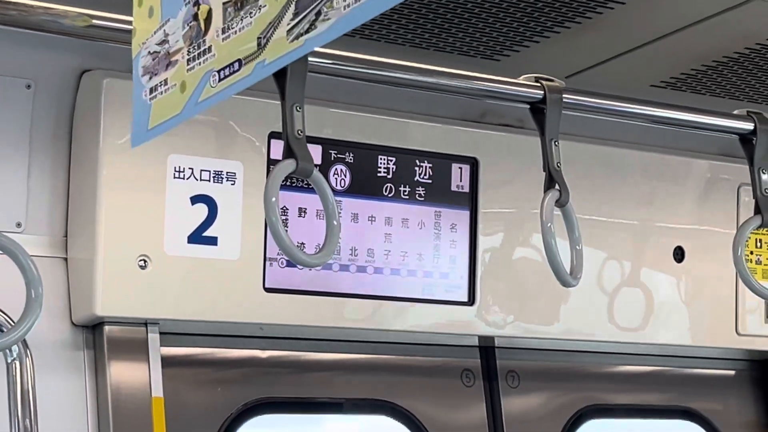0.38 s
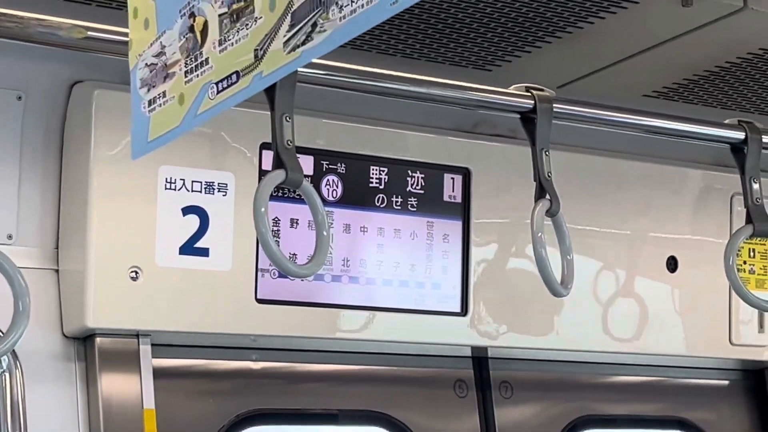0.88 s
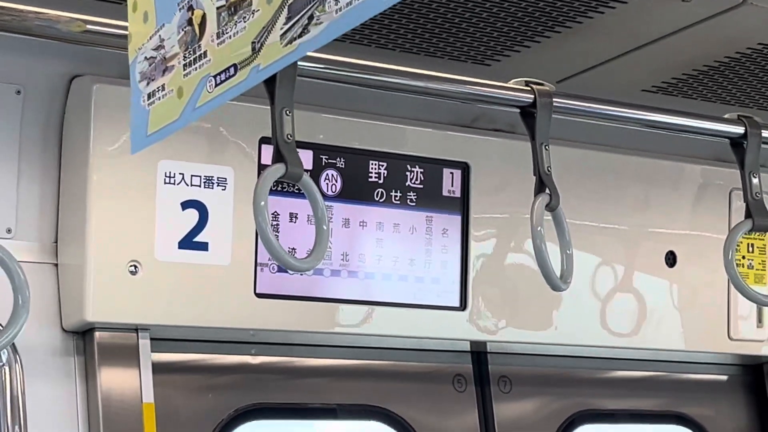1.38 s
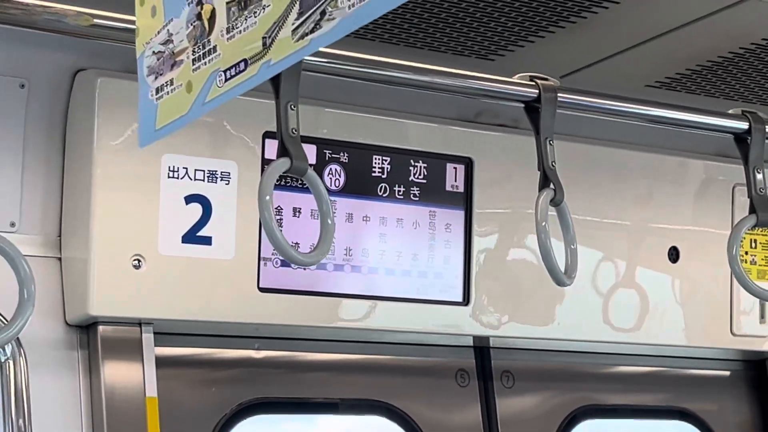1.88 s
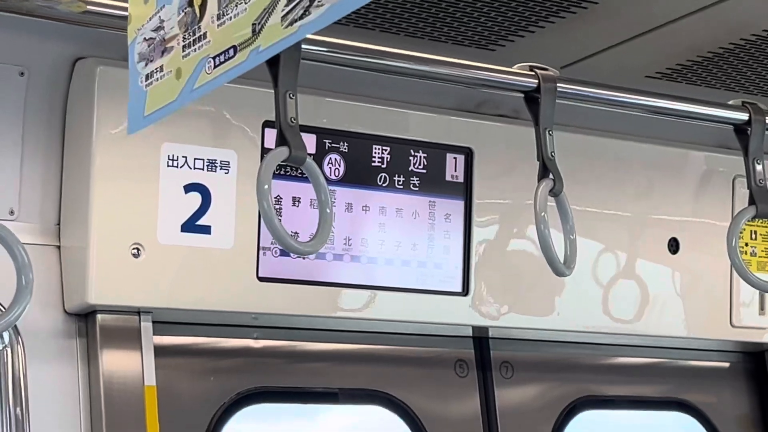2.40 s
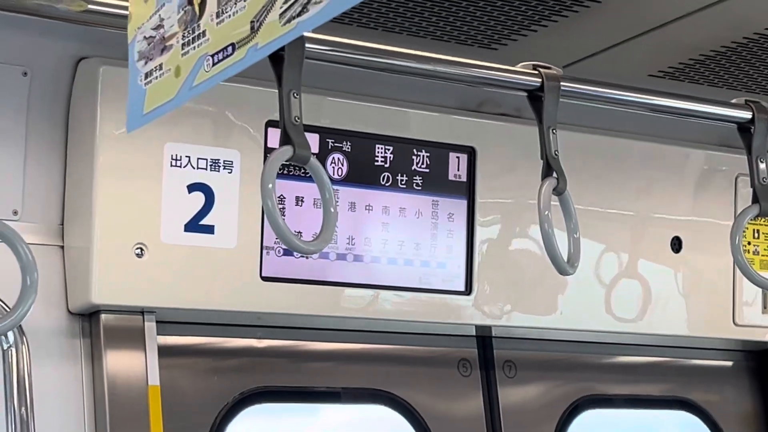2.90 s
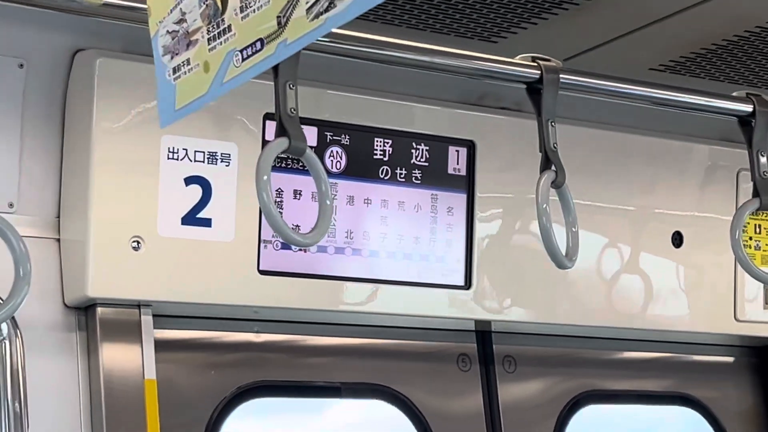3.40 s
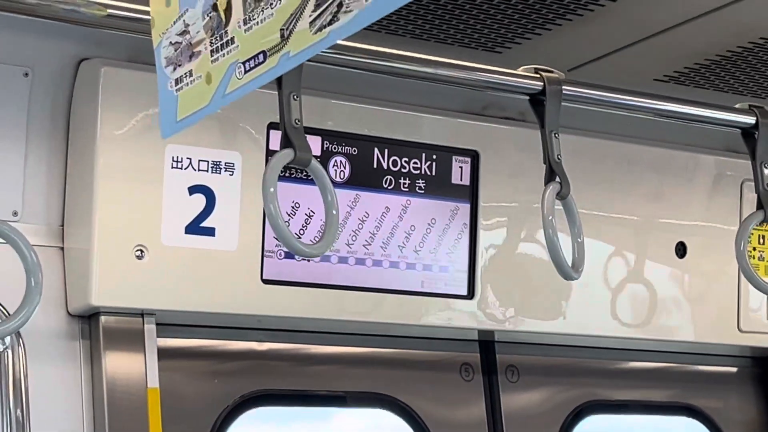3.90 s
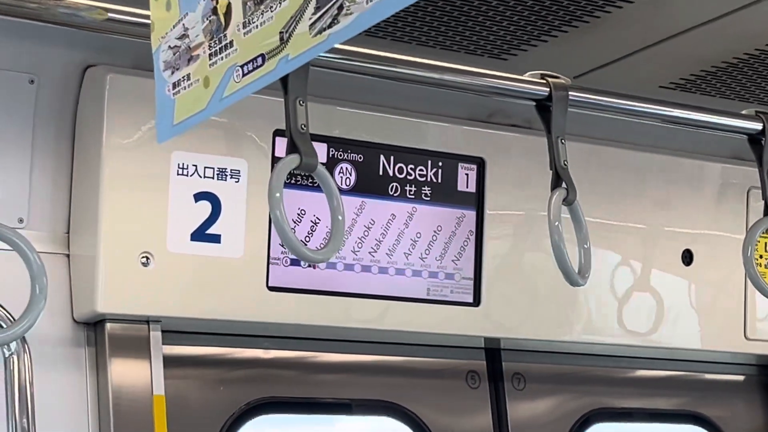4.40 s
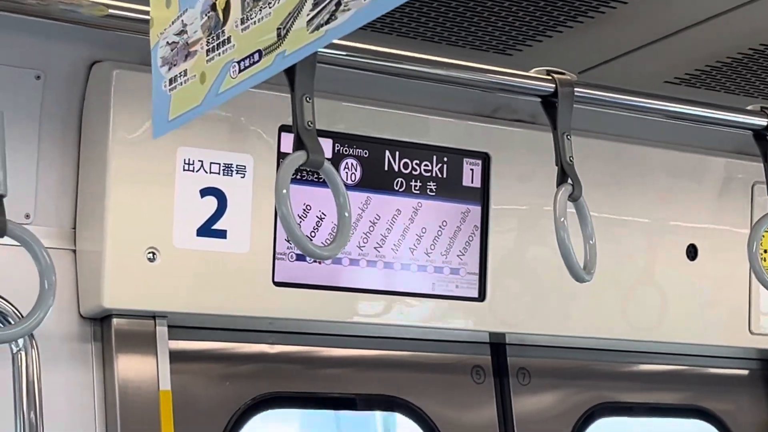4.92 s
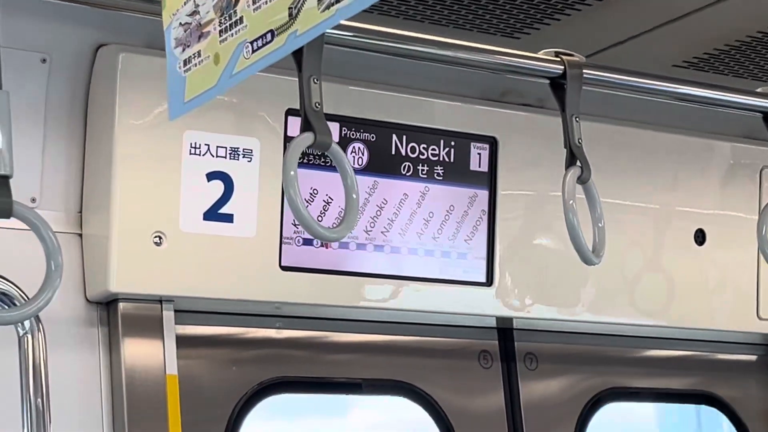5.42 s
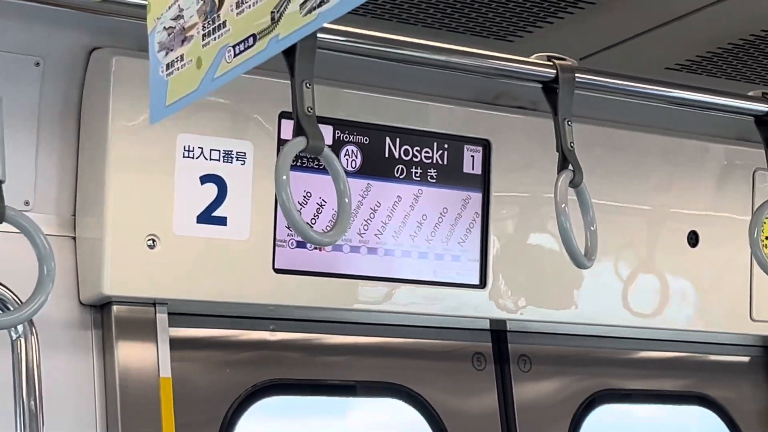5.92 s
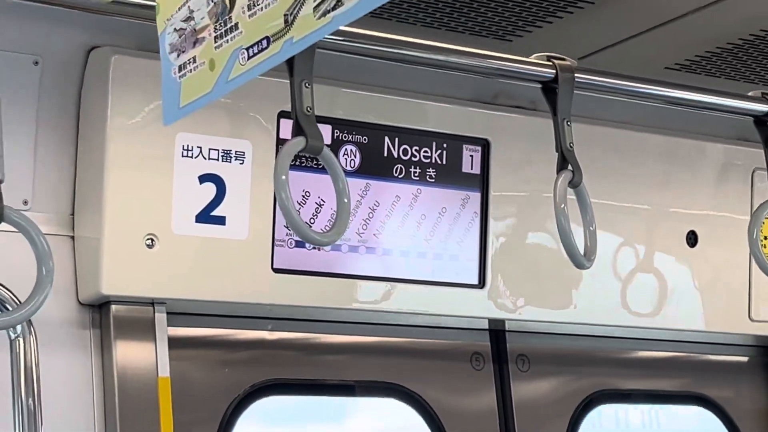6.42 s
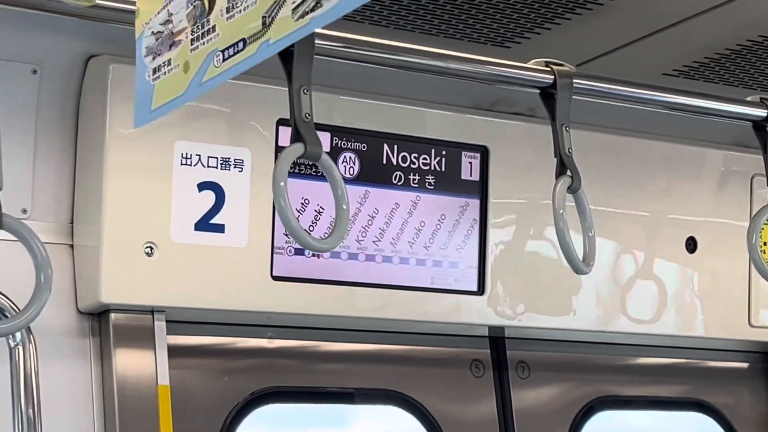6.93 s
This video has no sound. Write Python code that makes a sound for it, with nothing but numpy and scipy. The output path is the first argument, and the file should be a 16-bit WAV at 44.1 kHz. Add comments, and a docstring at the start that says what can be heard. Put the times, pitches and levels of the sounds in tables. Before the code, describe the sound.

Handheld stereo microphone in a train car between stations: bass-heavy rolling noise never stops, coloured by the body of the carriage, with close motor tones beating against each other. Brief hisses of air puff in the first second or so, a chirpy squeak of fittings sounds around the middle, a small click comes late, and dull deep bumps from the wheels finish it.

```python
"""Inside a running electric train

Three motors hum as sums of sinusoids at close shaft rates, which beat against each other.
Wheels and rails rumble and roar: broadband noise shaped by the resonances of the body.
Puffs of air (decaying noise), squeaks of the fittings (gliding tones), small ticks (noise bursts)
and dull knocks from the bogie (damped low modes) pass over it, above faint tones of the electrics."""
import sys
import numpy as np
from scipy import signal
from scipy.fft import rfft, irfft
from scipy.io import wavfile
from scipy.ndimage import uniform_filter1d

SR = 44100
rng = np.random.default_rng(int(sys.argv[2]) if len(sys.argv) > 2 else 0)


def store_pcm(level_fs):
    """Save levels as 16-bit WAV."""
    pcm = np.round(np.clip(level_fs, -1, 1) * 32767).astype(np.int16)
    wavfile.write(sys.argv[1], SR, np.atleast_2d(pcm).T)


def volts(x):
    """Linear amplitude factor 10**(x/20) for a level x in dB, scalar or array-like."""
    e = np.asarray(x, float) / 20
    return 10 ** e


N = 310905
T = np.arange(N) / SR  # time [s]
F = np.maximum(np.arange(N // 2 + 1) * SR / N, 1)  # frequency of each spectral bin [Hz]


def along(table, column=1):
    """Spectral interpolation: a table column over all frequencies, straight on a log axis."""
    table = np.array(table, float)
    return np.interp(np.log(F), np.log(table[:, 0]), table[:, column])


def unit(x):
    """Normalisation: scale to an rms of 1."""
    return x / np.sqrt(np.mean(x ** 2))


def walk(rate):
    """Low-pass random modulation: values held for 1 / rate [s], smoothed twice, with an rms near 1."""
    k = int(SR / rate)
    held = np.repeat(rng.standard_normal(N // k + 1), k)
    smooth = uniform_filter1d(uniform_filter1d(held, k), k)
    return unit(smooth[:N])


def bell(hz, width):
    """Simple resonance: the gain of a damped oscillator, 1 at its centre."""
    return 1 / np.sqrt(1 + ((F - hz * hz / F) / width) ** 2)


# faint tones of the electrics: (frequency [Hz], level [dB], rms waver of the level [dB])
ELECTRIC_TONES = [(120, -38.5, 2), (10730, -86, 2.5)]


def electric_tones():
    """Amplitude and phase modulation: sinusoids whose level and phase waver slowly."""
    out = 0
    for hz, db, waver_db in ELECTRIC_TONES:
        level = np.sqrt(2) * volts(db + waver_db * walk(4.5))
        out = out + level * np.sin(2 * np.pi * hz * T + .5 * walk(2.97))
    return out


# small hard contacts: (time [s], level [dB], centre of the resonance [Hz])
TICKS = [(1.864, -52, 9500), (3.4, -48.5, 3000), (4.39, -60, 10440), (6.244, -40, 5000),
         (6.243, -64, 12200)]


def ticks():
    """Impact excitation: a few milliseconds of noise in a broad resonance, with a weak slower tail."""
    out, grit = np.zeros(N), rng.standard_normal(N)
    for s, db, hz in TICKS:
        age = np.maximum(T - s, 0)
        coloured = unit(irfft(rfft(grit) * bell(hz, .5 * hz) ** 2, N))
        decay = np.exp(-age / .0052) + .13 * np.exp(-age / .03)
        out += volts(db) * coloured * (T >= s) * decay
    return out


# squeaks of the fittings: (time [s], length [s], level [dB], pitch [Hz], roughness [0-1])
SQUEAKS = [(3.435, .115, -39.5, 2072, .2), (3.54, .05, -45.5, 2280, .3), (3.572, .045, -43, 2090, .3),
           (3.59, .04, -50, 1620, .5), (3.66, .035, -51, 2290, .6), (3.67, .04, -51, 1810, .6),
           (4.03, .065, -47, 2070, .4), (4.06, .1, -64, 3450, 1), (4.1, .1, -65, 5150, 1),
           (4.62, .03, -48, 1350, .5), (4.66, .04, -48, 1680, .5), (5.86, .04, -50, 2090, .3),
           (6.18, .16, -50, 2340, .9), (6.19, .14, -49, 2000, 1), (6.5, .03, -45, 2095, .4)]
# overtones of a fitting: (ratio to the pitch, relative level [dB], delay [s], added roughness)
SQUEAK_OVERTONES = [(1, 0, 0, 0), (1.66, -19, .04, .8), (2.01, -27, .015, .2), (2.48, -27, .03, .7)]
SQUEAK_WOBBLE, SQUEAK_RISE_PER_S = .005, .04  # rms wobble and rise per second, as shares of the pitch
SQUEAK_ATTACK_S, SQUEAK_T60_S = .012, .12


def squeaks():
    """Friction-driven oscillation: sliding sustains a tone; a rough grip scatters its level and phase."""
    out, wobble = np.zeros(N), 1 + SQUEAK_WOBBLE * walk(35)
    for ratio, tone_db, late, extra in SQUEAK_OVERTONES:
        scatter = (walk(110) + 1j * walk(110)) / np.sqrt(2)
        for start, length, db, hz, grit in SQUEAKS:
            s, rough = start + late, min(grit + extra, 1)
            cut = slice(int(s * SR), int((s + length + .2) * SR))
            age = T[cut] - s
            # the pressure eases as the slide goes on
            ease_db = -6 * np.clip(age / length - .4, 0, 1)
            decay_db = -60 * np.maximum(age - length, 0) / SQUEAK_T60_S
            slide = np.clip(age / SQUEAK_ATTACK_S, 0, 1) * volts(decay_db + ease_db)
            cycles = ratio * hz * np.cumsum(wobble[cut] + SQUEAK_RISE_PER_S * age) / SR
            tone = np.exp(2j * np.pi * cycles)
            grip = np.sqrt(1 - rough) + np.sqrt(rough) * scatter[cut]
            out[cut] += np.sqrt(2) * volts(db + tone_db) * slide * np.imag(grip * tone)
    return out


# puffs of air: (time [s], level [dB], hold [ms], centre of the band [Hz])
PUFFS = [(.1, -62, 42, 5900), (.172, -51, 55, 4800), (.415, -53.5, 25, 4500), (0.436, -35, 54, 3330),
         (.706, -67.5, 12, 6500), (.733, -43, 22, 3000), (1.182, -46.5, 50, 3900), (2.06, -54, 22, 3180),
         (2.36, -62, 30, 5550), (2.814, -58, 20, 4160), (3.107, -58, 34, 4470), (3.5, -60.5, 60, 3300),
         (3.733, -51.5, 25, 2800), (4.05, -59.5, 140, 4000), (5.89, -58, 18, 4500),
         (6.246, -52.5, 81, 3800), (6.565, -55.5, 56, 4480), (6.758, -60, 13, 4500), (6.857, -54, 38, 4550)]
# colour of the escaping air: (frequency [Hz], relative spectral level [dB])
PUFF_COLOUR = [(600, -33), (1300, 4.5), (2500, -2.5), (5400, -8.5), (7300, -14.5), (8600, -23.5),
               (11400, -20.5), (14400, -35.5)]
# a stronger puff is broader and takes longer to die: values at a reference level, and growth per dB
PUFF_REF_DB = -60
PUFF_WIDTH_HZ, WIDTH_HZ_PER_DB, PUFF_T60_MS, T60_MS_PER_DB = 2500, 178, 270, 11
CAR_RIPPLE_DB, CAR_RIPPLE_HZ = 1.5, 120  # rms ripple of the spectrum, and the width it is smoothed over


def puffs():
    """Turbulent jet noise: sudden start, short hold, decaying tail; each opening favours its own band."""
    air = rfft(rng.standard_normal((2, N))) * volts(along(PUFF_COLOUR))
    # standing waves of the car colour the air in fine peaks and dips
    ripple = uniform_filter1d(rng.standard_normal(len(F)), int(CAR_RIPPLE_HZ * N / SR))
    air = air * volts(CAR_RIPPLE_DB * unit(ripple))
    snap = unit(irfft(air * bell(5500, 5000) ** 2, N))
    out = np.zeros((2, N))
    for s, db, hold_ms, hz in PUFFS:
        width = PUFF_WIDTH_HZ + WIDTH_HZ_PER_DB * (db - PUFF_REF_DB)
        t60_ms = PUFF_T60_MS + T60_MS_PER_DB * (db - PUFF_REF_DB)
        age_ms = 1000 * np.maximum(T - s, 0)
        tail = volts(-60 * np.maximum(age_ms - hold_ms, 0) / t60_ms)
        flow = tail * unit(irfft(air * bell(hz, width) ** 2, N))
        # the first rush has a band and a 30 ms decay of its own
        rush = .3 * np.exp(-age_ms / 30) * snap
        out += volts(db) * (1 - np.exp(-age_ms / 2.5)) * (flow + rush)
    return out * volts(1.3 * walk(400))  # the level flickers rapidly


# knocks of the bogie: (time [s], level before the soft onset [dB], pitch [Hz], t60 [s])
KNOCKS = [(1.2, -18, 95, .3), (1.34, -16, 130, .3), (2.2, -20, 215, .3), (2.38, -18, 145, .3),
          (4.78, -19, 200, .3), (4.92, -16, 180, .4), (5.7, -18, 205, .4), (6.46, -22, 220, .2),
          (6.55, -3, 72, .3), (6.64, -6, 74, .25), (6.695, -8, 70, .25), (6.995, -2, 75, .22)]


def knocks():
    """Damped modal vibration: a soft heavy push rings one low mode of the floor."""
    out = np.zeros(N)
    for s, db, hz, t60 in KNOCKS:
        age = np.maximum(T - s, 0)
        onset = 1 - np.exp(-age / .01)
        out += volts(db - 60 * age / t60) * onset * np.sin(2 * np.pi * hz * age)
    return out


# course of the rolling noise, each column used relative to its mean:
# (time [s], rumble [dB], roar [dB], ring and hiss [dB])
ROLL_COURSE = [(0.0, -24, -32, -45), (0.45, -26, -28.5, -45), (0.9, -24.5, -30.5, -46.5),
               (1.37, -21.5, -29, -46), (1.82, -26.5, -32, -47.5), (2.2, -22.5, -29.5, -45),
               (2.41, -25, -31, -46), (3.3, -24, -31.5, -45.5), (3.69, -24.5, -30.5, -45),
               (4.28, -23, -31.5, -45), (4.53, -26, -31.5, -45.5), (4.85, -21.5, -28, -44),
               (5.26, -25, -31, -44.5), (5.63, -25.5, -28.5, -44.5), (6.18, -23.5, -29, -44),
               (6.56, -20.5, -29.5, -43.5), (6.77, -27.5, -28.5, -43), (7.05, -22.5, -30.5, -43)]
# centres of those three parts: (frequency [Hz])
ROLL_PART_HZ = [140, 550, 1990]
# colour of the rolling noise: (frequency [Hz], relative spectral level [dB])
ROLL_COLOUR = [(15, -38.5), (25, -10.5), (40, -6), (54, -8.5), (80, -5), (114, -2.5), (321, -15.5),
               (430, -15), (858, -20), (1580, -34.5), (2490, -39.5), (5200, -53.5), (7400, -58),
               (8600, -59), (9800, -62.5), (11500, -65), (14400, -71.5)]
# resonances of the car body: (frequency [Hz], width [Hz], lift [dB])
BODY_RESONANCES = [(59, 7.6, 11), (89.5, 17.6, 5), (127, 33, 1), (161.3, 38, 3), (217.6, 39, 4.5),
                   (297.4, 32, 2.5), (513, 187, 4), (881, 200, 2), (1366, 210, 5), (1760, 38, 8),
                   (1942, 150, 8)]
# brief swells of the rolling noise in one region: (time [s], lift [dB], centre [Hz])
ROLL_SWELLS = [(.22, 4, 550), (.57, 4.5, 400), (1.37, 3.5, 1490), (2.2, 2.5, 1504), (2.21, 3, 90.3),
               (2.38, 6, 179), (4.64, 2, 1494), (4.93, 3.5, 148.6), (4.99, 4.5, 1187), (5.72, 7, 190.5),
               (5.92, 2.5, 1510), (6.23, 5, 1585), (6.38, 0.5, 90.3), (6.62, 7, 1685)]
SWELL_S, SWELL_OCTAVES = .024, .83  # Gaussian spread in time and in pitch
ROLL_DB, FLICKER_DB = -21.5, .5  # rms level of the whole, rms flicker of each band


def rolling():
    """Source and filter: wheel noise lifted by body resonances, its half-octave bands swinging in level."""
    s, *parts_db = np.transpose(ROLL_COURSE)
    swings = [db - np.mean(db) for db in parts_db]
    centres = np.log(ROLL_PART_HZ)
    lift = 1 + sum((volts(db) - 1) * bell(hz, width) ** 2 for hz, width, db in BODY_RESONANCES)
    source = rfft(rng.standard_normal((2, N))) * volts(along(ROLL_COLOUR)) * lift
    at, lift_db, swell_hz = np.transpose(ROLL_SWELLS)
    swells = lift_db[:, None] * np.exp(-((T - at[:, None]) / SWELL_S) ** 2 / 2)
    out = 0
    for octave in np.arange(4.5, 14.5, .5):  # log2 of the band centre in Hz
        band = np.cos(np.pi / 2 * np.clip(2 * (np.log2(F) - octave), -1, 1)) ** 2
        # each band blends the swings of the nearest parts
        shares = [np.interp(octave * np.log(2), centres, row) for row in np.eye(len(centres))]
        swing_db = sum(share * swing for share, swing in zip(shares, swings))
        swell_db = np.exp(-((octave - np.log2(swell_hz)) / SWELL_OCTAVES) ** 2 / 2) @ swells
        # in the top octaves only part of the swing is left
        depth = np.clip(1 - .4 * (octave - 12.5), 0, 1)
        band_db = depth * np.interp(T, s, swing_db) + swell_db + FLICKER_DB * walk(8.3)
        out = out + irfft(source * band, N) * volts(band_db)
    return volts(ROLL_DB) * unit(out)


# shaft rates of the three motors: (frequency [Hz])
MOTOR_HZ = [56.725, 58.459, 58.64]
# lines of the hum: (motor index, multiple of the shaft rate,
# time at which it is in step with the first line of that multiple [s])
HUM_LINES = [(0, 1, 0), (1, 1, .262), (2, 1, .333), (0, 2, 0), (1, 2, .047), (1, 6, 0), (1, 7, 0),
             (2, 7, .695)]
# one row per line of the hum: (rms level before the swells [dB])
HUM_DB = [-24, -32.5, -29, -30.5, -35, -46.5, -42.5, -46]
# slow swells of the hum: (time [s], first motor [dB], all lines at seven times the shaft rate [dB])
HUM_SWELLS = [(0, -7.5, -2), (.5, -2.5, -2), (.9, -0.5, -0.5), (1.4, 1, 1.5), (1.75, -5, 3), (2.1, -0.5, 3),
              (2.8, -2.5, -2.5), (3.6, -5.5, 3.5), (4.2, 0, -1.5), (4.5, 3.5, 3), (5, 2.5, 2.5),
              (5.55, 3, 2.5), (5.75, -1.5, 2.5), (6.1, -2.5, 1), (6.35, -2, -3), (6.65, 4, 1.5),
              (7.05, 4, 3.5)]
HUM_WAVER_DB, HUM_SWAY_RAD = .96, .13  # rms waver of level and phase


def motor_hum():
    """Beating: lines at close shaft rates, and their multiples, drift in and out of step."""
    out, first_hz = 0, {}
    at, *columns = np.transpose(HUM_SWELLS)
    first_db, seventh_db = (np.interp(T, at, column) for column in columns)
    for (motor, multiple, s), db in zip(HUM_LINES, HUM_DB):
        hz = multiple * MOTOR_HZ[motor]
        lead_hz = first_hz.setdefault(multiple, hz)
        steady = 2 * np.pi * (hz * (T - s) + lead_hz * s) + np.pi * (multiple - 1)
        phase = steady + HUM_SWAY_RAD * walk(3.3)
        swell_db = first_db * (motor == 0) + seventh_db * (multiple == 7)
        level = np.sqrt(2) * volts(db + swell_db + HUM_WAVER_DB * walk(2.955))
        out = out + level * np.cos(phase)
    return out


# stereo image by frequency:
# (frequency [Hz], likeness of left and right [0-1], left minus right [dB], phase lead of the left [rad])
STEREO_IMAGE = [(40, .997, -.6, 0), (75, .99, -.6, 0), (130, .97, -2.3, 0), (280, .74, -1, 0),
                (390, .8, 0, -.3), (700, .33, -.3, 0), (1000, .3, -.5, -.3), (1400, .15, -4, -2.5),
                (1700, .6, -6.5, .5), (2200, .78, -5, .4), (2900, .92, -1.5, .2), (3700, 1, 0, 0),
                (5100, 1, 0, 0), (5700, .82, 0, -.8), (7300, .72, 0, -1.6), (7800, .99, 0, -3.0),
                (9100, .99, 0, -3.3), (9700, .5, 0, -4.3), (10800, .7, 0, -5.8), (11200, 1, 0, -6.28),
                (12800, 1, 0, -6.28), (13700, .4, 0, -7.5), (14500, 1, 0, -9.4)]


def stereo_image(common, apart):
    """Partial coherence: likeness, level difference and phase of left and right vary with frequency."""
    alike = np.clip(along(STEREO_IMAGE, column=1), 0, 1)
    level_lean = volts(along(STEREO_IMAGE, column=2) / 2)
    lean = level_lean * np.exp(.5j * along(STEREO_IMAGE, column=3))
    middle = rfft(common) * np.sqrt((1 + alike) / 2)
    side = rfft(apart) * np.sqrt((1 - alike) / 2)
    return irfft(np.array([(middle + side) * lean, (middle - side) / lean]), N)


def scene():
    """Superposition: noises are two unrelated draws; single sources add a late reflection to the second."""
    edge = np.clip(np.minimum(T, T[-1] - T) / .008, 0, 1)  # 8 ms fades
    diffuse = edge * (rolling() + puffs())
    hum = edge * (motor_hum() + electric_tones())
    rattles = edge * (squeaks() + ticks() + knocks())
    late = np.roll(.22 * hum + 1.7 * rattles, int(.0093 * SR))  # 9.3 ms later
    return stereo_image(diffuse[0] + hum + rattles, diffuse[1] + late)


def top_cut(x):
    """Nothing passes above the cut-off."""
    return signal.sosfilt(signal.butter(12, 14530, fs=SR, output="sos"), x)


def record(dry):
    """Signal chain: the finished stereo mix goes through the last stage."""
    return top_cut(dry)


dry = scene()
out = record(dry)
store_pcm(out)
```